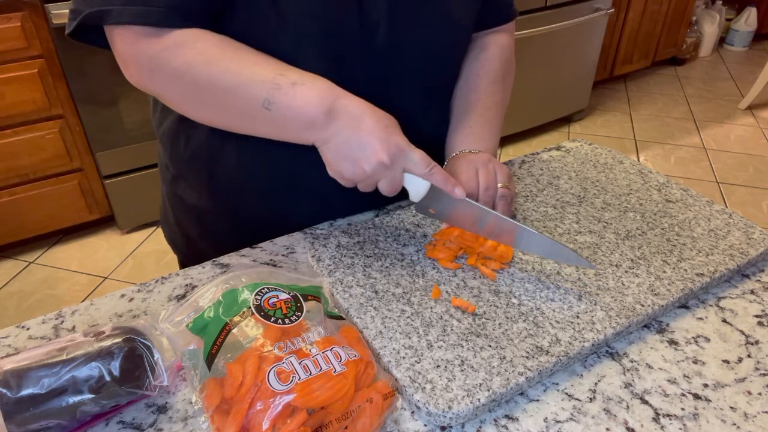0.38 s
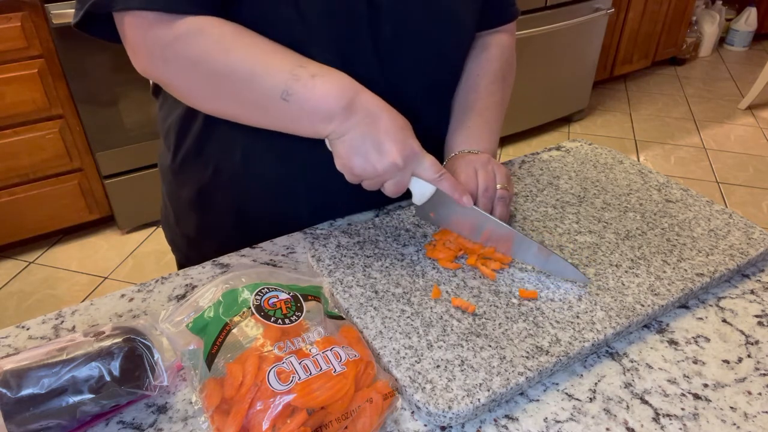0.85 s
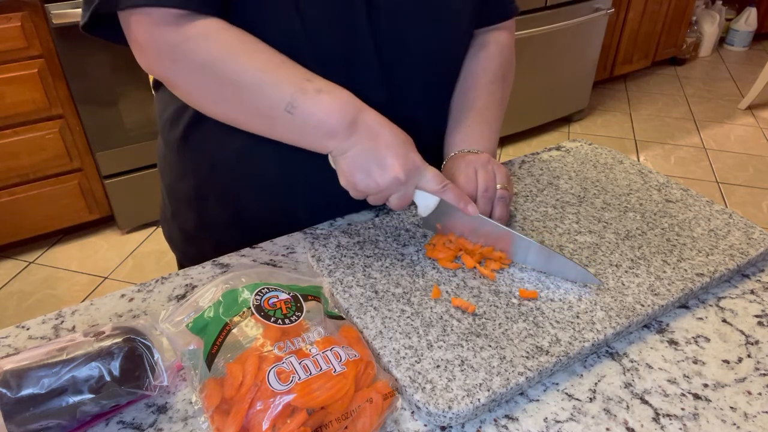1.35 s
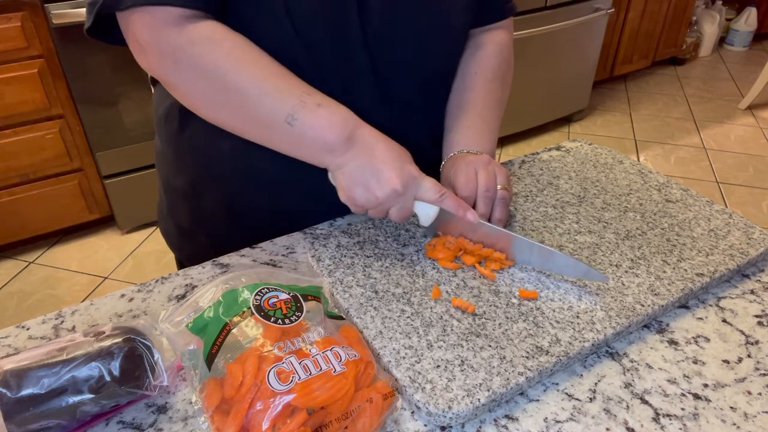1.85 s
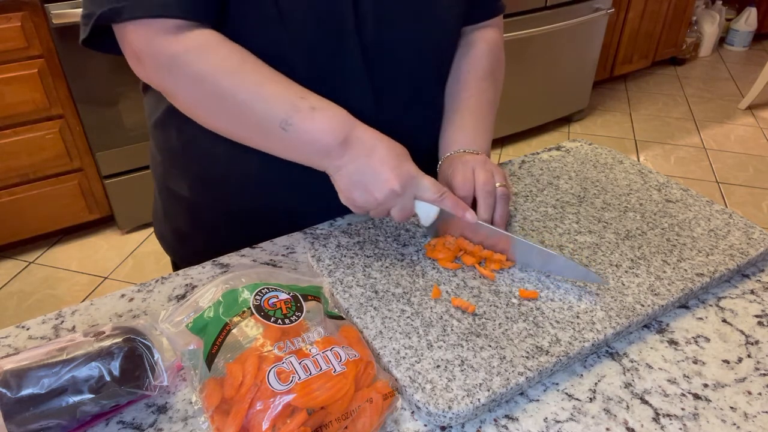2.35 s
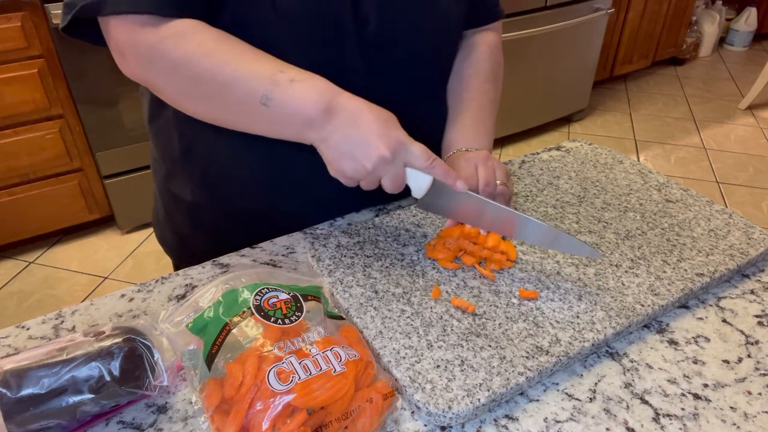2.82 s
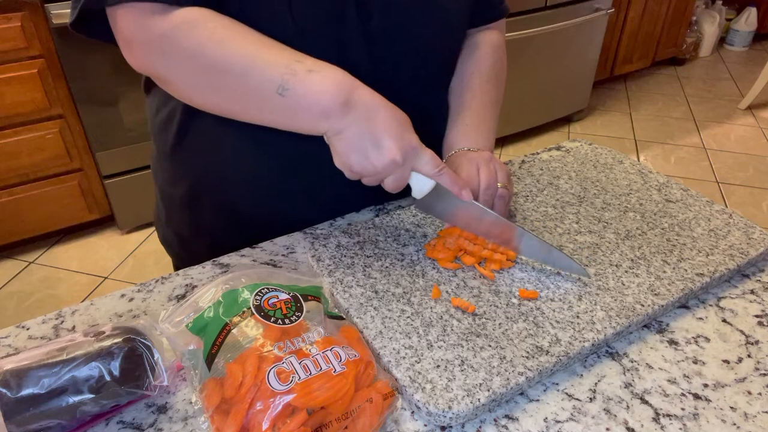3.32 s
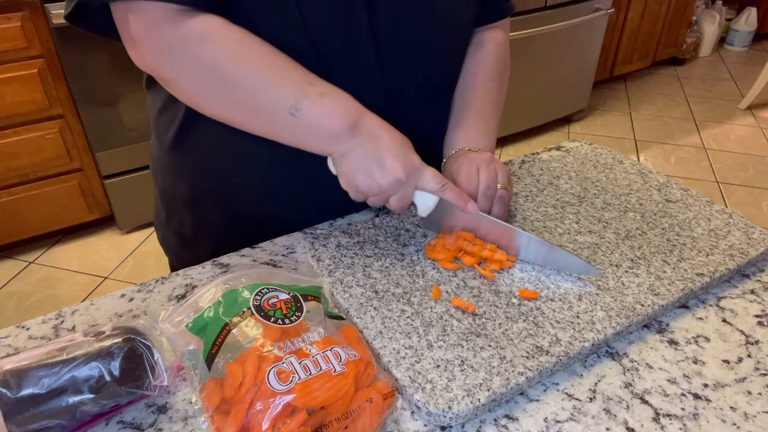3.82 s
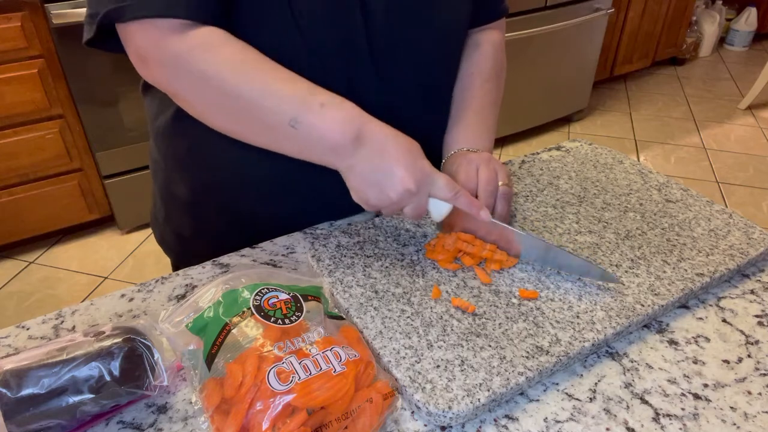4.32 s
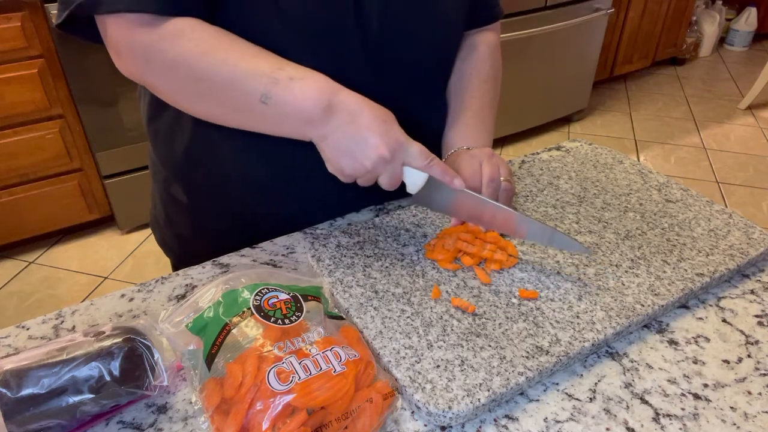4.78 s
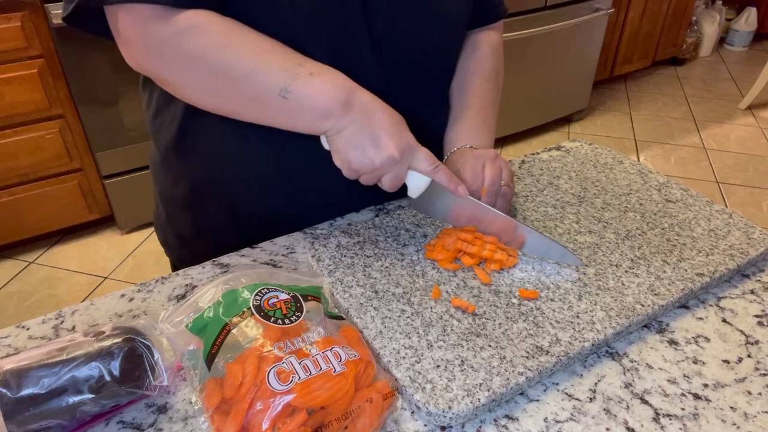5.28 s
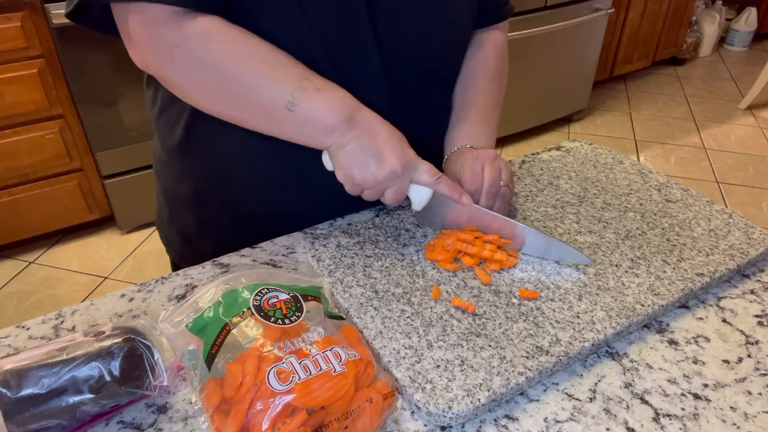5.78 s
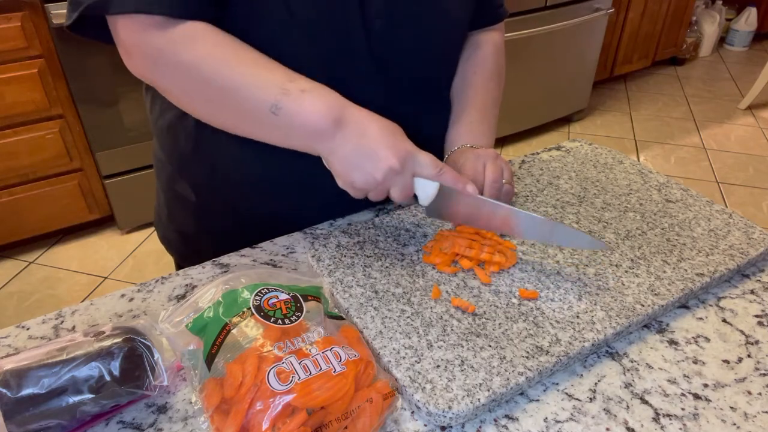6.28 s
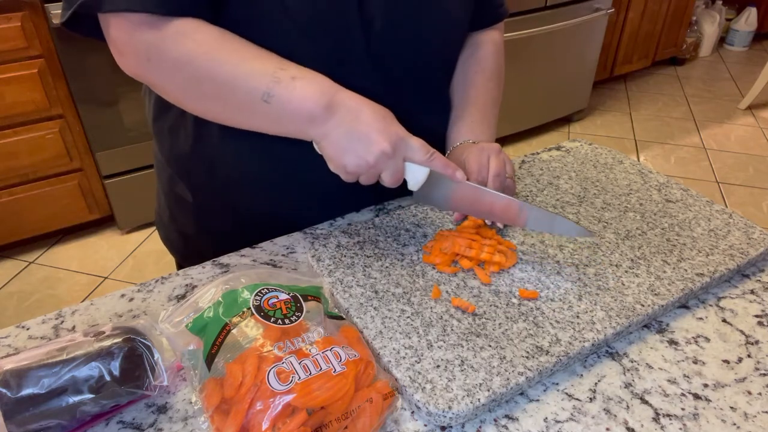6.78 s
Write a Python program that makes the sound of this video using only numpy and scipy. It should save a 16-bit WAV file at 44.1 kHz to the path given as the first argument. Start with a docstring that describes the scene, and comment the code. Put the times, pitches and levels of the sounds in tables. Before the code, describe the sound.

A kitchen knife dices carrot on a stone slab in short crunchy runs, with snapping fibres, blade knocks and low appliance hum.

```python
"""Dicing carrot on a stone slab

A kitchen knife dices carrot on a slab lying on a counter, in quick runs with pauses. The edge crackles through
the fibres (shaped noise), single fibres snap (short noise bursts), and at the end of some strokes the blade
knocks on the slab (struck modes and dying noise); the counter thumps under the push (two low modes).
A hard-walled kitchen rings after it all (decaying noise), over hum and drones of appliances (banded noise)."""
import sys
import numpy as np
from scipy import signal
from scipy.fft import rfft, irfft
from scipy.io import wavfile
from scipy.ndimage import uniform_filter1d

SR = 44100
rng = np.random.default_rng(int(sys.argv[2]) if len(sys.argv) > 2 else 0)


def voltage_ratio(decibels):
    """Convert decibels (scalar or array-like) to amplitude ratios, 20 dB per decade."""
    exponent = np.asarray(decibels, float) / 20
    return 10 ** exponent


def int16_out(signal):
    """Quantize to a 16-bit WAV file."""
    q = np.round(np.clip(np.atleast_2d(signal).T, -1, 1) * 32767)
    wavfile.write(sys.argv[1], SR, q.astype(np.int16))


N = 303849      # length in samples


def rms_one(x):
    """Scale to rms 1."""
    return x / np.sqrt(np.mean(x ** 2) + 1e-20)


def at_hz(points, hz, column=1):
    """Read a table on a log-frequency axis."""
    points = np.array(points)
    return np.interp(np.log(hz), np.log(points[:, 0]), points[:, column])


def band(x, low_hz, high_hz):
    """Butterworth band-pass."""
    sos = signal.butter(2, [low_hz, min(high_hz, .45 * SR)], "band", fs=SR, output="sos")
    return signal.sosfilt(sos, x)


def clicks(seconds, sizes):
    """A train of single-sample clicks over a negligible floor."""
    out = np.full(N, 1e-18)
    places = np.round(np.asarray(seconds) * SR).astype(int)
    np.add.at(out, np.clip(places, 0, N - 1), sizes)
    return out


def ring(x, hz, t60):
    """Two-pole resonance: a unit click sets a decaying sine of height 1 ringing."""
    radius, angle = voltage_ratio(-60 / (t60 * SR)), 2 * np.pi * hz / SR
    return signal.lfilter([0, np.sin(angle)], [1, -2 * radius * np.cos(angle), radius * radius], x)


def dying_noise(size, t60):
    """White noise that decays evenly in dB."""
    return rng.standard_normal(size) * voltage_ratio(-60 * np.arange(size) / SR / t60)


def spread(mid, side, alike):
    """Stereo from two independent noises: likeness 1 is the same on both sides, 0 unrelated, -1 opposed."""
    alike = np.clip(alike, -1, 1)
    return np.sqrt(1 + alike) * mid + np.sqrt(1 - alike) * side * [[1], [-1]]


def hum():
    """Appliances and air: third-octave bands of stereo noise."""
    # spectrum of the hum, relative from band to band: f/Hz, density/dB per Hz
    spectrum = [(56, -46), (95, -17.5), (146, -4.5), (244, -8.5), (278, -7.5), (445, -3), (552, -7.5),
                (761, -9.5), (847, -11), (3070, -35.5), (3560, -54), (16000, -57.5)]
    # how alike left and right are: f/Hz, likeness (-1 to 1)
    likeness = [(60, 1), (240, 0.36), (950, -0.66), (3770, 0.39), (15000, 0.33)]
    total_db = -51.12      # rms of the whole hum
    out, edges = 0, 25 * 2 ** np.arange(0, 9.5, 1 / 3)
    white = rng.standard_normal((2, 2, N + 8000))
    for k, (low, high) in enumerate(zip(edges, edges[1:])):
        # neighbouring bands use different noise; the filter's onset is cut away
        mid, side = band(white[k % 2], low, high)[:, 8000:]
        hz = np.sqrt(low * high)
        out = out + voltage_ratio(at_hz(spectrum, hz)) * spread(mid, side, at_hz(likeness, hz))
    return voltage_ratio(total_db) * rms_one(out)


def motor():
    """Motors and ducts: noise ringing twice in each narrow resonance."""
    # narrow drones within the hum: f/Hz, width of one resonance/Hz, rms level/dB, left-right likeness (-1 to 1)
    drones = [(59.15, 10, -56, .9), (92, 32, -63.5, 1), (401, 25, -64.5, 0.11), (478.3, 16, -58.5, .0),
              (553.8, 20, -60, .0), (703, 24, -66.5, .0), (860, 50, -65, 0.29)]
    out = 0
    for hz, width_hz, level_db, alike in drones:
        t60 = np.log(1000) / np.pi / width_hz
        noise = rng.standard_normal((2, N + SR))
        mid, side = ring(ring(noise, hz, t60), hz, t60)[:, SR:]      # the build-up is cut away
        out = out + voltage_ratio(level_db) * rms_one(spread(mid, side, alike))
    return out


def early_hiss():
    """Faint mid-treble noise that drops quickly, lifts a little around 0.6 s and sinks again."""
    # course of the hiss: t/s, level/dB
    course = [(0, -65.5), (.3, -87), (0.599, -82), (.9, -92)]
    hiss_db = np.interp(np.arange(N) / SR, *np.transpose(course))
    return voltage_ratio(hiss_db) * rms_one(band(rng.standard_normal((2, N)), 1500, 4300))


def crackle_gains():
    """Gain of the bright and of the dull crackle: each burst swells or fades evenly in dB."""
    # bursts of crackle from the edge, and short noise swelling into the knocks at 1.98 and 2.42 s, one row each:
    # start/s, end/s, level halfway/dB, swell from start to end/dB, dull part against the bright/dB
    bursts = [(0.357, 0.405, -78, -11.5, -1), (0.453, 0.474, -85, -3, -3), (0.563, 0.641, -68.5, 10, -9),
              (0.656, 0.747, -66.5, 8, -14), (0.749, 0.767, -39, 6.5, -0.8), (0.922, 1.004, -61, 7, 4.5),
              (1.22, 1.324, -78.5, 14, -5), (1.318, 1.349, -57.5, 11.5, -1), (1.347, 1.41, -43.5, 3, 1.3),
              (1.497, 1.5, -41, 3, 5.5), (1.609, 1.646, -45.5, 1.5, 4), (1.749, 1.788, -42.5, 14.5, -3),
              (1.932, 1.96, -67, -3.5, -16.5), (1.952, 1.981, -46, 51, 7), (2.413, 2.425, -46, 25, 6),
              (2.656, 2.774, -82.5, -5, 0), (3.058, 3.133, -82, 3.5, -7), (3.203, 3.279, -72.5, 9.5, -14.5),
              (3.336, 3.456, -65, -7, -26), (3.478, 3.506, -43.5, 41, -7), (3.659, 3.726, -54, -7, -3.5),
              (3.755, 3.79, -54, 4.5, -2), (3.788, 3.84, -40.5, 2, -3.5), (3.918, 3.967, -42, -3, -0.15),
              (4.062, 4.095, -45, -14.5, 1.5), (4.393, 4.52, -79, -10, 6), (4.9, 4.964, -82, 7, 2),
              (5.285, 5.327, -67.5, -12, -11), (5.334, 5.367, -39, 16, -4), (5.622, 5.681, -47.5, 8.5, 1),
              (5.858, 5.9, -37, -9, -7.5), (5.975, 6.037, -53, -12.5, 6.5), (6.292, 6.327, -61, -10, 1.5)]
    fade_s = 0.0033      # each burst fades in and out over this long
    bright, dull = np.zeros(N), np.zeros(N)
    for start, end, level_db, swell_db, dull_db in bursts:
        inside = slice(round(start * SR), round(end * SR))
        swell = np.linspace(-.5, .5, inside.stop - inside.start)
        bright[inside] = voltage_ratio(level_db + swell_db * swell)
        dull[inside] = bright[inside] * voltage_ratio(dull_db)
    return uniform_filter1d([bright, dull], size=round(fade_s * SR), axis=1)


def cuts():
    """Dense tiny fractures of uneven size, as grainy noise in bursts; bright, with a duller part from the flesh."""
    # colour of the crackle, held level below 3300 Hz: f/Hz, relative density/dB per Hz
    colour = [(1760, -31), (3000, -3), (3450, -6), (5000, 1.5), (6090, -5.5), (7720, -2.5), (10900, -2.5),
              (16000, -8.5)]
    bright, dull = crackle_gains()
    # fibres fail in bunches of 60 samples
    clumps = np.repeat(voltage_ratio(rng.normal(0, 4.75, N // 60 + 1)), 60)[:N]
    unevenness = voltage_ratio(4 * np.minimum(rng.exponential(1, N), 4))
    grains = clumps * rng.standard_normal(N) * unevenness
    hz = np.arange(1, N // 2 + 2) * SR / N
    coloured = irfft(rfft(grains) * voltage_ratio(at_hz(colour, np.maximum(hz, 3300))), N)
    bright_crackle = bright * rms_one(band(coloured, 2400, 15000))
    dull_crackle = dull * rms_one(band(grains, 660, 5100))
    return bright_crackle + dull_crackle


def snaps():
    """Each snap is a few milliseconds of dying noise, a bright crack over a duller one."""
    # the loudest single fibres snapping: t/s, peak of the bright crack/dB
    loud_snaps = [(0.4439, -48.5), (0.6098, -52), (0.6227, -44), (0.6277, -39), (0.6678, -37.5),
                  (0.7026, -54), (0.7537, -26), (0.763, -23.5), (0.9296, -48), (0.9442, -31.5),
                  (0.9542, -30.5), (0.9734, -34), (1.3256, -36), (1.339, -27.5), (1.3605, -20.5),
                  (1.368, -18.5), (1.3848, -20.5), (1.4019, -25), (1.491, -21), (1.6179, -27.5),
                  (1.6286, -28), (1.6448, -24.5), (1.752, -21.5), (1.7681, -17.5), (1.7849, -20.5),
                  (1.923, -33.5), (1.9622, -31.5), (3.2632, -46), (3.3417, -45), (3.3624, -37.5),
                  (3.3846, -39), (3.4852, -31.5), (3.4967, -18.5), (3.6676, -25.5), (3.7737, -32),
                  (3.7974, -17), (3.8168, -17.5), (3.919, -33.5), (3.9302, -15.5), (3.9537, -21.5),
                  (4.066, -14), (5.2957, -45), (5.6346, -30), (5.6691, -29), (5.8414, -33.5),
                  (5.8594, -17.5), (5.8757, -20), (5.9774, -22.5), (6.0119, -28.5)]
    dull_mean_db, dull_spread_db = -9.5, 3.7      # the duller crack against the bright one
    small_per_s, small_db = 40, 11.5      # lesser snaps at random in each burst, this far over its crackle gain
    out, crackle = np.zeros(N + 600), crackle_gains()[0]
    small = np.flatnonzero((rng.random(N) < small_per_s / SR) & (crackle > 0))
    events = [(round(s * SR), voltage_ratio(peak_db)) for s, peak_db in loud_snaps]
    events += [(i, crackle[i] * voltage_ratio(small_db)) for i in small]
    for i, peak in events:
        onset = np.minimum(np.arange(600) / 12, 1)
        burst = dying_noise(size=600, t60=0.0063) * onset
        bright, dull = band(burst, 3600, 14500), band(burst, 1800, 5000)
        dull_db = dull_mean_db + dull_spread_db * rng.standard_normal()
        crack = bright / np.abs(bright).max() + voltage_ratio(dull_db) * dull / np.abs(dull).max()
        out[i:i + 600] += peak * crack
    return out[:N]


def thumps():
    """A soft push of some milliseconds rings the two lowest modes of the counter."""
    # the push reaches the counter: t/s, low mode level/dB, high mode level/dB (both before a common lift)
    pushes = [(0.776, -32, -43), (1.396, -48, -45), (1.635, -47, -51), (1.778, -60, -44),
              (1.984, -31.5, -32.5), (2.437, -42, -39), (3.511, -52, -50), (3.805, -47, -41),
              (3.944, -42, -43), (4.102, -37.5, -38.5), (5.376, -35, -44), (5.649, -45.5, -46),
              (5.864, -49.5, -47), (6.035, -39.5, -39)]
    # the two counter modes: f/Hz, t60/s
    modes = [(84, .14), (156, 0.089)]
    lift_db = 8.5
    rows, push = np.array(pushes), np.hanning(round(0.0049 * SR))
    rings = 0
    for k, (hz, t60) in enumerate(modes):
        # struck 3 ms early, as the push takes time to build
        rings = rings + ring(clicks(rows[:, 0] - .003, -voltage_ratio(rows[:, 1 + k] + lift_db)), hz, t60)
    return np.convolve(rings, push / push.sum())[:N]


def knocks():
    """Every mode is struck; bending waves in the slab are slower in the bass, so deep modes speak later."""
    # blade meets slab: t/s, slab level/dB, then against it: deep slab modes/dB, blade/dB, steel tick/dB
    hits = [(1.0036, -38.5, -1, 2, 9), (1.9802, -14, -1, 2, -6), (2.4226, -23, 0, -6.5, 5.5),
            (3.5017, -24, -6.5, 9.5, 14.5), (4.0949, -30, -7.5, 4.5, 2), (5.6427, -36.5, -5, 19.5, 23),
            (6.0265, -23, -9, -0.5, 6)]
    # modes of slab and blade: f/Hz, level within the part/dB, t60/s, part that rings (name)
    modes = [(199, -16, .09, "middle"), (405, -5, 0.085, "middle"), (638, -12, .05, "deep"),
             (708, -21, 0.21, "tick"), (717.6, 1.8, 0.14, "deep"), (880.7, -0.5, 0.1, "deep"),
             (1090, -20, 0.078, "middle"), (1257, -1.5, 0.019, "middle"), (1379, 5.5, .05, "middle"),
             (1513, -5.5, 0.12, "blade"), (1706, 1, 0.033, "deep"), (1787, 0.5, 0.05, "blade"),
             (1851, 3.5, 0.03, "blade"), (1997, 3.5, 0.14, "high"), (2242, -1, .025, "high"),
             (2480, -11.5, 0.008, "high"), (2784, -7.5, 0.028, "high"), (3170, -15.5, 0.021, "high"),
             (3290, -11.5, 0.027, "tick"), (3614, -9, 0.022, "tick"), (3800, -10, .02, "high"),
             (5120, -13.5, 0.019, "tick"), (5743, -18, 0.0083, "tick"), (6240, -10.5, 0.015, "tick"),
             (6395, -16.5, .012, "tick")]
    # close modes heard together as dying noise: low f/Hz, high f/Hz, level within the part/dB, t60/s, part (name)
    wash = [(3900, 9200, -4, 0.0087, "tick"), (550, 700, -12.5, 0.012, "deep"),
            (1180, 2000, -8, .03, "middle"), (1650, 2000, -8, 0.019, "blade"),
            (1900, 3100, 1, 0.03, "high")]
    # parts with a level of their own in each hit, in column order (name); the others follow the slab level
    parts = ["deep", "blade", "tick"]
    rows, out = np.array(hits), np.zeros(N + 4000)

    def part_db(part):
        """Level of one part in every hit."""
        return rows[:, 1] + (rows[:, 2 + parts.index(part)] if part in parts else 0)

    for hz, level_db, t60, part in modes:
        late = .15 / np.sqrt(hz) - .0018 + rng.uniform(0, .0018, len(rows))      # seconds
        sizes = voltage_ratio(part_db(part) + level_db + rng.normal(0, 2.0, len(rows)))
        signs = rng.choice([-1, 1], len(rows))
        out[:N] += ring(clicks(rows[:, 0] + late, sizes * signs), hz, t60)
    t = np.arange(4000) / SR
    for low_hz, high_hz, level_db, t60, part in wash:
        swell = 1 - np.exp(-t * low_hz / 1.1)      # builds over a few cycles
        for s, hit_db in zip(rows[:, 0], part_db(part)):
            noise = rms_one(band(rng.standard_normal(4000), low_hz, high_hz))
            out[round(s * SR):][:4000] += voltage_ratio(hit_db + level_db - 60 * t / t60) * swell * noise
    now = np.arange(N) / SR
    latest = np.maximum(np.searchsorted(rows[:, 0], now) - 1, 0)
    since = now - rows[latest, 0]
    # the blade settles on the slab and damps the first ring
    settling_db = 7.3 * np.exp(-(since / 0.01) ** 2) - 7.0
    return out[:N] * voltage_ratio(settling_db)


def placed(x, echo_db, echo_s):
    """Path and housing shift and shade left against right by band; a counter bounce comes later on the right."""
    # left over right, shared half and half by the sides: f/Hz, level/dB
    left_over_right = [(60, -1.5), (150, -2), (380, 2.5), (950, -6), (2380, -2), (5980, -4.5), (15000, 2)]
    # lead of the left side: f/Hz, phase/rad
    left_lead = [(0, 0), (950, -0.9), (1980, -1.5), (3450, -2), (5340, -4.5), (7240, -9.0), (13300, -6),
                 (16400, -3)]
    hz = np.arange(1, N // 2 + 2) * SR / N
    half = voltage_ratio(at_hz(left_over_right, hz) / 2)
    lead = np.exp(1j * np.interp(hz, *np.transpose(left_lead)))
    direct = np.array([half * lead, 1 / half])
    bounce = voltage_ratio(echo_db) * np.exp(-2j * np.pi * np.outer(echo_s, hz))
    return irfft(rfft(x) * (direct + bounce), N)


def kitchen(x):
    """Diffuse echoes die band by band, partly alike on both sides; near surfaces give a fast first part."""
    # the room by band: f/Hz, t60 of the late echoes/s, late level/dB, near level/dB, left-right likeness (-1 to 1)
    room = [(148.8, 0.65, -46.5, -49, 0.68), (700, 0.649, -45, -30, 0.34), (2000, 0.79, -49, -38.5, 0.13),
            (4740, 0.63, -45, -36.5, 0.15), (11900, 0.45, -49, -45.5, 0.2)]
    near_t60 = 0.14      # seconds
    t, tail, edges = np.arange(SR) / SR, 0, 80 * 2 ** np.arange(0, 8, .5)
    for low, high in zip(edges, edges[1:]):
        hz = np.sqrt(low * high)
        late = voltage_ratio(at_hz(room, hz, column=2) - 60 * t / at_hz(room, hz))
        near = voltage_ratio(at_hz(room, hz, column=3) - 60 * t / near_t60)
        mid, side = band(rng.standard_normal((2, SR)), low, high)
        tail = tail + (late + near) * spread(mid, side, at_hz(room, hz, column=4))
    arrival = np.clip(t / .012, 0, 1)      # echoes gather over 12 ms
    return signal.fftconvolve(x[None], tail * arrival, axes=1)[:, :N]


def scene():
    """Board sounds and counter, their room, and the background of hum, drones and hiss."""
    background = hum() + motor() + early_hiss()
    board = cuts() + snaps() + knocks()
    counter = thumps()
    near_sound = placed(board, echo_db=-11, echo_s=[.0013, .0017]) + counter
    return near_sound + kitchen(board + counter) + background


def roll_off(x):
    """The treble ends steeply here."""
    return signal.sosfilt(signal.butter(12, 16810, fs=SR, output="sos"), x)


def record(dry):
    """The microphones lose the deepest bass and the very top; peaks are gently rounded."""
    heard = band(dry, 45, 15500)
    mix = 1.029 * np.tanh(heard / 0.87)
    return roll_off(mix)


dry = scene()
out = record(dry)
int16_out(out)
```